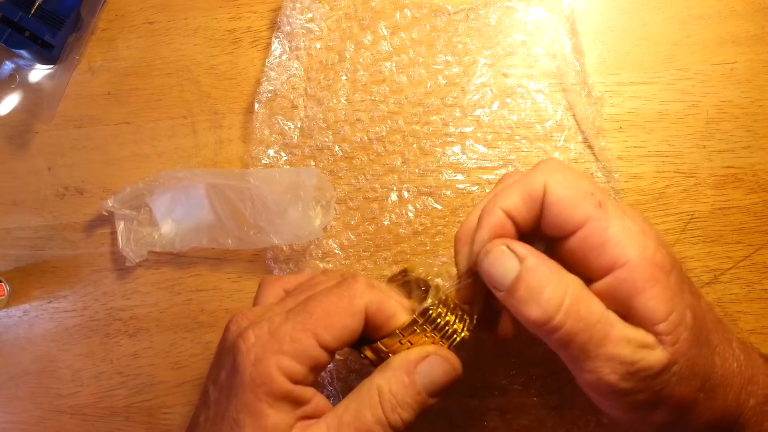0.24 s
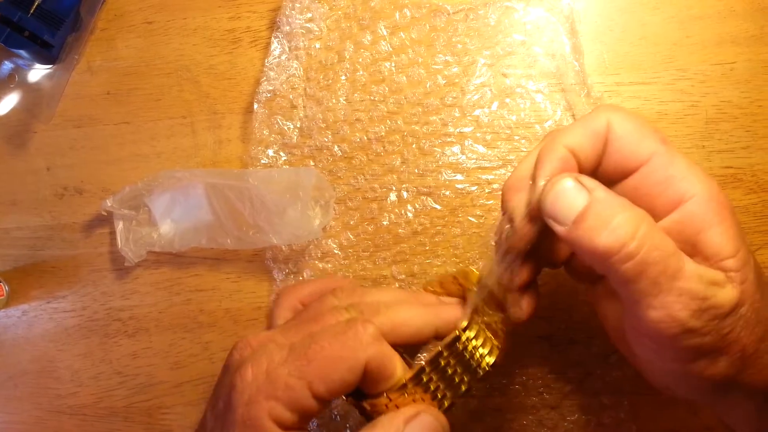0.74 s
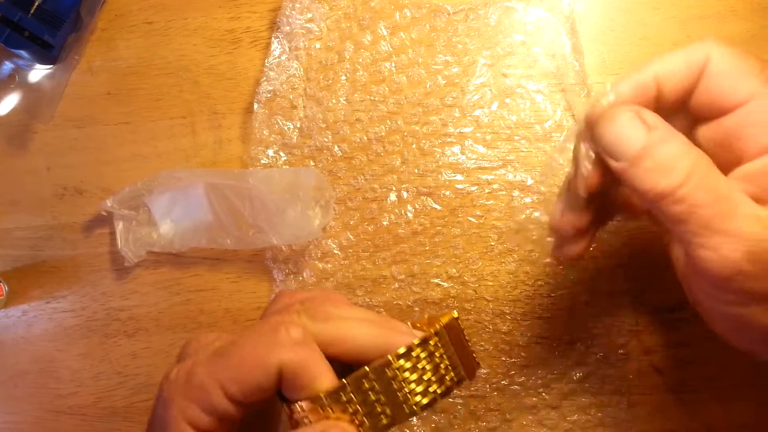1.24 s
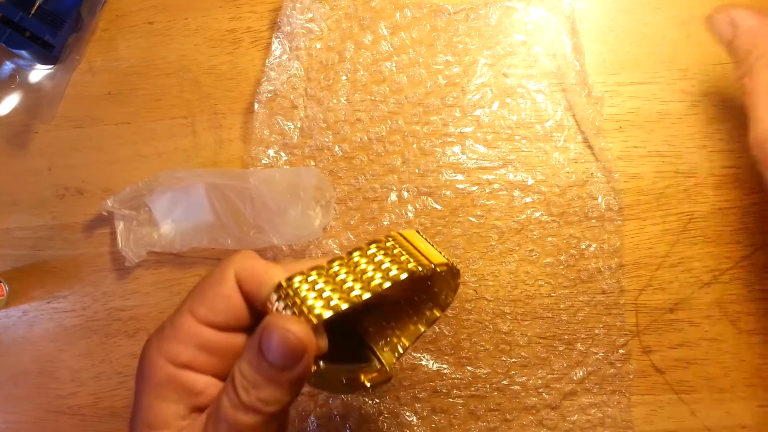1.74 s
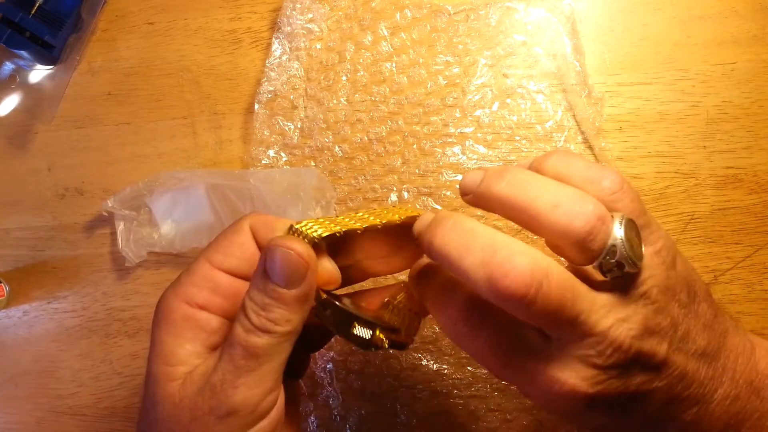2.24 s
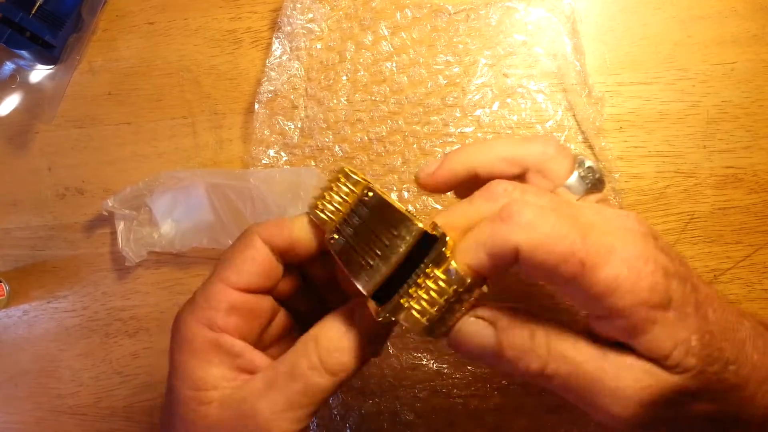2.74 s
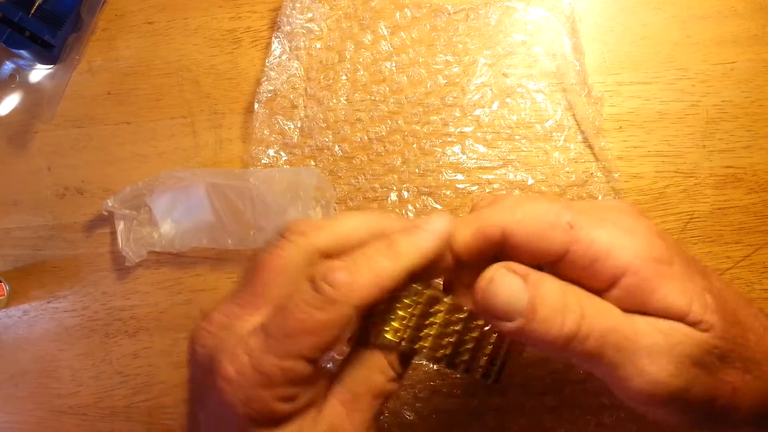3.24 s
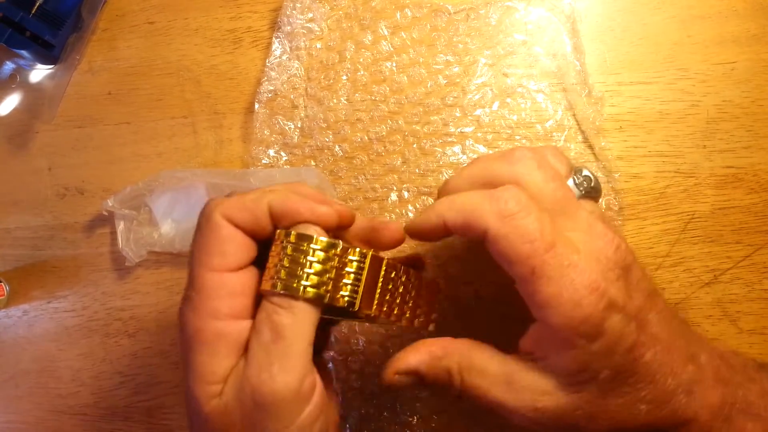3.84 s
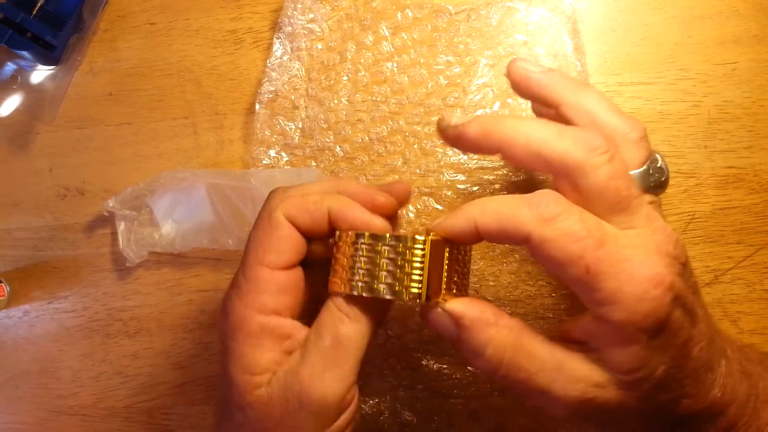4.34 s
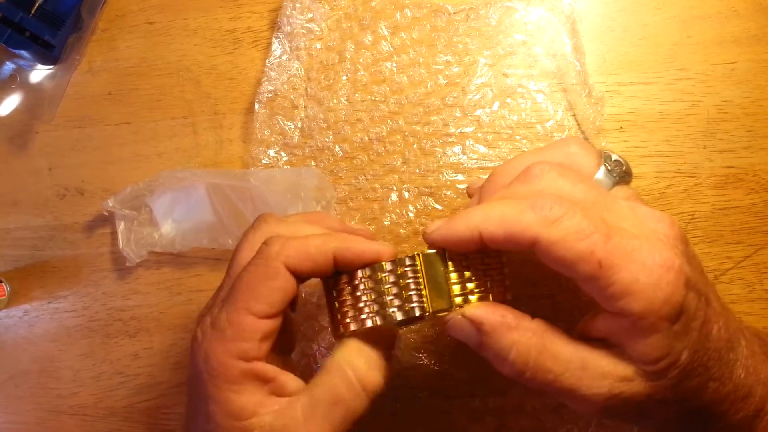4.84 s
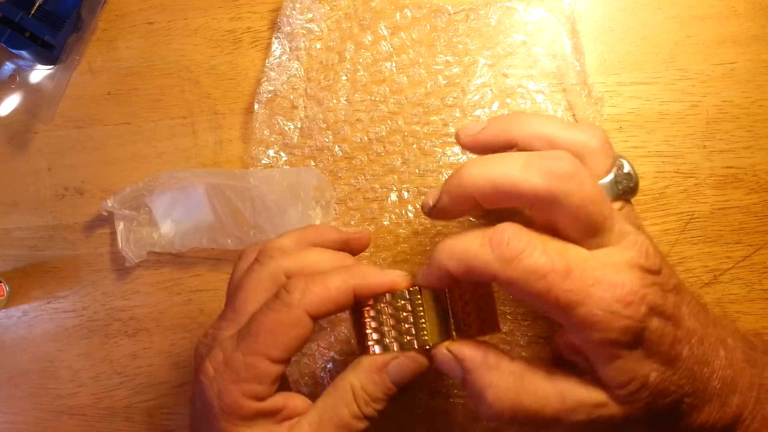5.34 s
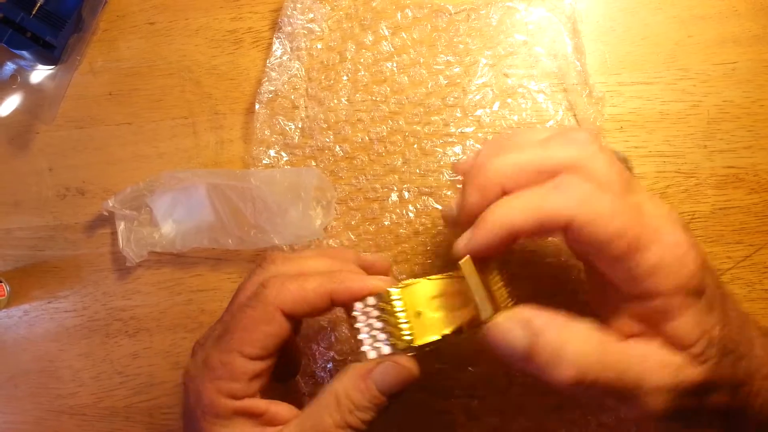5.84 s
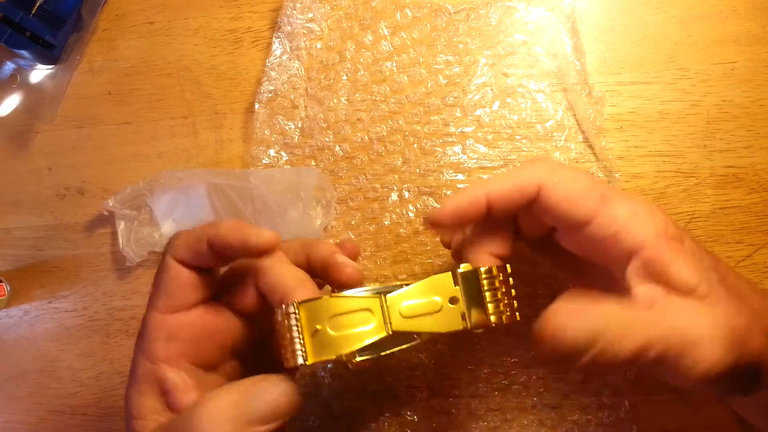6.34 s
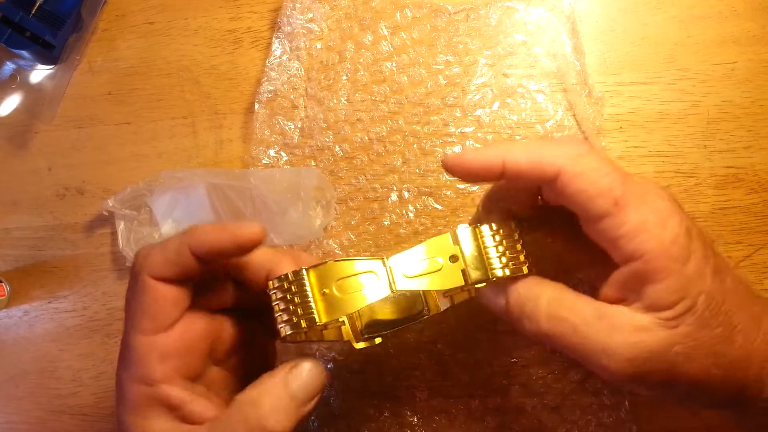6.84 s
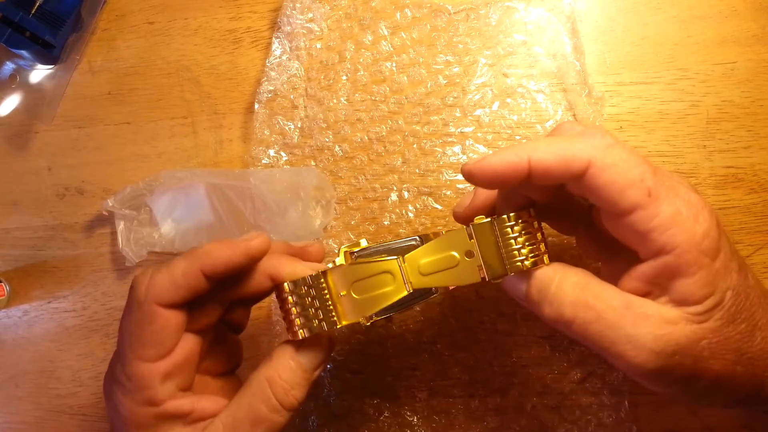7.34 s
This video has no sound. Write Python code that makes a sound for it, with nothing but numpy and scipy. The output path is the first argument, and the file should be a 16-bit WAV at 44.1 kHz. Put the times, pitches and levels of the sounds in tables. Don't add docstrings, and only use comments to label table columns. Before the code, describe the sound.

Plastic film tears off a metal watch bracelet in sharp snaps, then links clink and a clasp springs open with a bright metallic clack.

```python
import sys
import numpy as np
from scipy import signal
from scipy.fft import rfft, irfft
from scipy.io import wavfile
from scipy.ndimage import uniform_filter1d

SR = 44100
rng = np.random.default_rng(int(sys.argv[2]) if len(sys.argv) > 2 else 0)


def master(y):
    cut = np.clip(np.atleast_2d(y).T, -1, 1)
    pcm = np.round(cut * 32767)
    wavfile.write(sys.argv[1], SR, pcm.astype(np.int16))


def elevation(decibels):
    levels = np.asarray(decibels, float)
    return 10 ** (levels / 20)


N = 334249


def band(x, low_hz, high_hz):
    return signal.sosfilt(signal.butter(2, [low_hz, min(high_hz, .45 * SR)], "band", fs=SR, output="sos"), x)


def rms_one(x):
    return x / np.sqrt(np.mean(x ** 2) + 1e-20)


def top_one(x):
    return x / np.sqrt(uniform_filter1d(np.mean(x ** 2, axis=0), size=66).max())


def ring(clicks, hz, t60):
    radius, w = elevation(-60 / (t60 * SR)), 2 * np.pi * hz / SR
    return signal.lfilter([0, np.sin(w)], [1, -2 * radius * np.cos(w), radius ** 2], clicks + 1e-18)


# f/Hz, level/dB per Hz, left-right/dB
HISS_COLOUR = [(30.8, -19.5, 4), (59, -5.5, 1.5), (142, 1, 3.5), (198, -2.5, -2.5), (364, -7.5, 5),
               (610, -11, 0), (1030, -14.5, -1), (1850, -18.5, 0.5), (2800, -20, 1.5), (4660, -22.5, -0.5),
               (6000, -28, 1), (8100, -24, 3), (11200, -23.5, 2), (14500, -25, 3.5)]


def hiss():
    hz, db, pan_db = np.transpose(HISS_COLOUR)
    log_f = np.log(np.maximum(np.fft.rfftfreq(N, 1 / SR), 1))
    side = np.array([[1], [-1]])
    colour_db = np.interp(log_f, np.log(hz), db) + np.interp(log_f, np.log(hz), pan_db) / 2 * side
    white = rng.standard_normal((2, N))
    return elevation(-52) * rms_one(irfft(rfft(white) * elevation(colour_db), N))


# f/Hz, level/dB
MOTOR_HARMONICS = [(120.5, -75.5), (242, -75), (363, -72), (423, -70.5), (696, -73.5), (847.5, -79.5),
                   (969, -70.5), (1090, -71.5), (1211, -89), (1694, -87)]


def motor():
    white = rng.standard_normal((2, N + SR))
    return sum(elevation(db) * rms_one(ring(white, hz, t60=1.0)[:, SR:]) for hz, db in MOTOR_HARMONICS)


# t/s, level/dB, decay/s
TICK_SURGES = [
    (0.416, 1.5, 1),
    (3.663, 5, 0.19),
]


def frame_tick():
    ticks_per_s, start_s = 30.04721, .00946
    length_s, ramp_s, height, right_share = .001382, .00034, .048, -.07
    t = np.arange(N) / SR
    since = (t - start_s) % (1 / ticks_per_s)
    pulse = np.clip(since / ramp_s, 0, 1) - np.clip((since - length_s) / ramp_s, 0, 1)
    for stage in range(2):
        pulse = signal.lfilter(*signal.butter(1, 110, "high", fs=SR), pulse)
    w = 2 * np.pi * 217
    pulse = signal.lfilter(*signal.bilinear([1, 0, 0], [1, w / .65, w * w], SR), pulse)
    swell_db = sum(db * np.exp(-np.maximum(t - s, 0) / decay_s) * (t > s) for s, db, decay_s in TICK_SURGES)
    return height * elevation(swell_db) * pulse * [[1], [right_share]]


# f/Hz, t60/s, level/dB
ROOM_BANDS = [(497, 0.75, -16), (1080, 0.25, -5.5), (2020, 0.15, -4), (4440, 0.24, -8), (8600, 0.19, -6),
              (13600, 0.083, -3)]


def room(x):
    t = np.arange(16384) / SR
    white, tail = rng.standard_normal((2, 2, len(t))), 0
    for k, (hz, t60, db) in enumerate(ROOM_BANDS):
        noise = band(white[k % 2], hz / np.sqrt(2), hz * np.sqrt(2))
        dying = noise * elevation(-60 * t / t60) * np.clip(t / 0.00075, 0, 1)
        tail = tail + elevation(db) * dying * np.sqrt(np.log(10) * 6 / t60 / SR)
    return signal.fftconvolve(x.mean(axis=0, keepdims=True), tail, axes=1)[:, :N]


# t/s, level/dB
HANDLING = [(0, -68.5), (.27, -58.5), (.36, -63.5), (.88, -63.5), (1.2, -75), (2.1, -84.5), (2.5, -61),
            (2.78, -90.5), (2.93, -58.5), (3.28, -61.5), (3.5, -73.5), (4.2, -70), (4.29, -52), (4.4, -74),
            (5.6, -79), (5.7, -65.5), (6.26, -64.5), (6.4, -80)]
# t/s, start level/dB, hold/s, end level/dB
BURSTS = [
    (0.421, -37, 0.023, -31.5),
    (0.64, -44, 0.016, -40.5),
    (.895, -56, 0.073, -38),
    (3.665, -26, 0.017, -35.5),
]


def rustle_gain():
    t, attack_s, fall_db_per_s = np.arange(N) / SR, 0.001, 216
    curves = [np.interp(t, *np.transpose(HANDLING))]
    for s, db, hold, end_db in BURSTS:
        times = [s - attack_s, s, s + hold, s + hold + 1]
        levels = [db - 42, db, end_db, end_db - fall_db_per_s]
        curves.append(np.interp(t, times, levels, left=-200))
    return elevation(np.max(curves, axis=0))


def rustle(per_s, spread_db):
    sizes = elevation(spread_db * np.minimum(rng.exponential(1, (2, N)), 3)) * rng.choice([-1, 1], (2, N))
    grains = sizes * (rng.random((2, N)) < per_s / SR)
    grains = grains + 0.062 * grains[::-1]
    sound = band(grains, 2200, 6200) + elevation(-4) * band(grains, 1500, 15000)
    return rms_one(sound) * rustle_gain()


# f/Hz, width/Hz, level/dB
PORT_RESONANCES = [(4730, 2600, 2.5), (7060, 2400, -2.5), (9700, 1800, -10)]


def port(x):
    return x + sum(elevation(db) * band(x, hz - width / 2, hz + width / 2) for hz, width, db in PORT_RESONANCES)


def placed(rows, pan_db):
    scatter_db = 5 * rng.standard_normal(len(rows))
    return [(*row[:4], pan_db + 0.09 * row[3] + e, *row[4:]) for row, e in zip(rows, scatter_db)]


def knocks(rows, modes, modes_db, scrape_s, rattle_s, rattle_db, cycles, thump_hz, thump_db, spike, narrow):
    size = 3072
    out, t = np.zeros((2, N + size)), np.arange(size) / SR
    noise = rng.standard_normal((len(rows), 3, size))
    strengths = rng.uniform(-1.7, 1, (len(rows), len(modes)))
    decay = np.exp(-t / scrape_s) + elevation(rattle_db) * np.exp(-t / rattle_s)
    edge = decay * np.clip(.1 + t / 0.00045, 0, 1)
    noise[:, 0, 12] = spike * np.sign(noise[:, 0, 12])
    for row, (shared, left, right), chance in zip(rows, noise, strengths):
        s, db, hz, bright_db, pan_db = row[:5]
        low_db = row[5] if len(row) > 5 else thump_db
        sides = np.array([left, right])
        both = edge * (shared + 0.33 * sides)
        apart = edge * (.9 * shared + sides)

        lowest_hz = max(narrow * hz, 1600)
        resonance = ring(both, hz, min(cycles, 12) / hz) * .2 + port(both)
        click = top_one(band(band(resonance, lowest_hz, 7500), .7 * lowest_hz, 7500))
        bright = top_one(band(port(apart), 6300, 16000))
        push = edge * shared + .15 * both
        thump = .02 * ring(push, thump_hz * elevation(.6 * chance[0]), .012) + push
        thump = top_one(band(thump, 480, 2000))
        body = 0
        for (m_hz, m_db, t60), e in zip(modes, chance):
            dull_db = min(bright_db, 0) if m_hz > 6500 else 0
            body = body + elevation(m_db + 3 * e + dull_db) * ring(both, m_hz * elevation(.02 * e), t60)

        sound = click + elevation(bright_db) * bright + elevation(low_db) * thump + elevation(modes_db) * body
        sound = elevation(db) * sound * elevation(pan_db / 2 * np.array([[1], [-1]]))
        at = round(s * SR)
        out[0, at + 2:at + size] += sound[0, :-2]
        out[1, at:at + size] += sound[1]
    return out[:, :N]


def faint_touches(count):
    t = np.arange(0, N / SR - .1, .001)
    share = np.cumsum(elevation(.8 * np.interp(t, *np.transpose(HANDLING))))
    chance = rng.random((count, 4))
    s = np.interp((np.arange(count) + chance[:, 0]) / count, share / share[-1], t)
    click_db = -55 + 4 * (chance[:, 1] - .5)
    click_hz = 3900 * elevation(3.2 * (chance[:, 2] - 1.0))
    return np.transpose([s, click_db, click_hz, -12 + 14 * chance[:, 3]])


# t/s, level/dB, f/Hz, bright level/dB
LINK_TAPS = [(1.4325, -51, 2720, -5), (1.5817, -51, 2800, -2), (1.6172, -47, 3800, -13),
             (1.6241, -37.5, 4070, -7), (1.8182, -51, 2950, -15), (2.1354, -47.5, 4800, -2),
             (2.2288, -46.5, 4600, -6), (2.2371, -47.5, 1940, -6), (2.4954, -50, 3660, -9),
             (2.5327, -46.5, 4820, -2), (2.666, -51, 4950, -1), (2.8026, -52.5, 5000, -7),
             (2.8576, -50, 4610, 3), (2.8804, -46, 4100, -10), (2.8897, -51.5, 4350, 6.5),
             (2.92, -46.5, 3880, 4), (2.9336, -45.5, 4820, 3), (3.0058, -47, 4640, -3),
             (3.0078, -40.5, 6200, -11), (3.0143, -41, 5500, 9), (3.0245, -35, 4700, 5),
             (3.0312, -43, 5000, 6), (3.0975, -51, 4500, -14), (3.1128, -48.5, 4230, -11),
             (3.1516, -40, 3840, -11), (3.1535, -42, 5500, -4), (3.1987, -44.5, 4700, -1),
             (3.2595, -46.5, 4610, 4), (3.2802, -46.5, 3320, -8), (3.2845, -41.5, 4390, -11),
             (3.3052, -42, 6300, 1), (3.4043, -44, 3600, 2), (3.4695, -47.5, 2930, -3),
             (3.637, -50.5, 4260, 8.5), (3.82, -54, 3620, 12), (3.8808, -55.5, 3790, 8), (3.911, -49, 3190, 0),
          (3.9582, -47, 3660, 0), (3.9735, -48, 4090, 5.5), (3.9961, -34.5, 3730, 2.5),
          (3.9987, -43.5, 4120, 1), (4.004, -39.5, 3930, -3), (4.0822, -45.5, 5040, 1.5),
          (4.226, -48, 4700, -6), (4.2482, -48, 4650, -2), (4.2595, -35, 5140, 2.5),
          (4.268, -43, 4310, -10), (4.2754, -52, 4570, -7), (4.284, -41, 4830, 2), (4.2917, -42, 4400, -7),
          (4.3001, -36, 4850, 0), (4.3062, -35.5, 4400, -9), (4.315, -45, 3620, -8),
          (4.327, -41, 4060, 3.5), (4.39, -46, 5600, -3), (4.5885, -45, 4900, -8), (4.722, -52, 3640, -14),
          (4.9418, -54, 4520, -11), (4.9948, -46.5, 4300, -8), (5.173, -48, 4200, 3),
          (5.1932, -40.5, 5340, 3.5),
             (5.6555, -50, 2630, -8), (5.676, -40.5, 6160, 5), (5.6828, -43, 6400, 4),
             (5.6867, -46, 2630, -7), (5.6927, -43.5, 2500, -7), (5.782, -38.5, 5300, 0.5),
             (5.875, -49, 4160, -4), (5.8995, -67, 3000, -10), (5.9135, -42.5, 2980, -6),
             (5.961, -45, 4200, -10), (5.9652, -41, 4320, 2), (5.973, -43, 3490, -4),
             (6.0135, -52, 1510, -10), (6.0717, -42, 3880, -1), (6.095, -51, 3500, -3),
             (6.1012, -49, 1340, 7), (6.107, -37.5, 4100, 2), (6.1356, -51, 4260, -5),
             (6.189, -50, 1960, -2), (6.2325, -52, 4200, -6), (6.2413, -46, 2240, -4),
             (6.248, -52, 5000, 5), (6.253, -47, 2450, 3), (6.2653, -45, 3200, -8), (6.273, -44, 4430, -10),
             (6.311, -39.5, 5540, -8), (7.1187, -49.5, 3820, -2)]
# f/Hz, level/dB, t60/s
LINK_MODES = [(4090, -11, 0.022), (7480, -20, 0.033), (10100, -13, .04), (11700, 22, 0.06)]


def link_knocks():
    rows = placed([*LINK_TAPS, *faint_touches(count=16)], pan_db=-2.5)
    return knocks(rows, LINK_MODES, modes_db=-55, scrape_s=0.0016, rattle_s=0.0075, rattle_db=-15,
                  cycles=16.0, thump_hz=800, thump_db=-14.0, spike=4.5, narrow=0.39)


# t/s, level/dB, f/Hz, bright level/dB, thump level/dB
CLASP = [
    (3.6652, -16, 3900, 0, -16),
    (3.6722, -18.5, 3900, 3, -30),
    (3.6765, -20, 3800, 2, -30),
    (3.6815, -21, 4300, 3, -30),
    (3.6868, -22, 4200, 0, -30),
    (3.6899, -17, 4100, 5, -30),
    (3.6938, -23, 4300, 2, -30),
    (3.7112, -33, 4180, -4, -40),
]
# f/Hz, level/dB, t60/s
CLASP_MODES = [(3410, -14, .1), (3800, -9, .05), (4095, -7, .12), (4380, -13, .07), (7500, -15, .04),
               (8010, -10, .04), (9840, -8, .04), (10070, -6, .05), (10470, 0, .11), (10900, -3, .07),
               (11240, -1, .1), (11330, -2, .06), (11680, -3, .04), (12550, -12, .03)]


def clasp_opening():
    return knocks(placed(CLASP, pan_db=1.5), CLASP_MODES, modes_db=-23, scrape_s=0.00086, rattle_s=0.0028,
                  rattle_db=-18, cycles=18.0, thump_hz=960, thump_db=-22, spike=3.2, narrow=0.69)


def struck(blows):
    out, click = np.zeros(N + SR), np.eye(1, 8192)[0]
    for s, db, hz, t60 in blows:
        out[round(s * SR):][:8192] += elevation(db) * ring(click, hz, t60)
    out = signal.lfilter(*signal.iirnotch(1150, 2.2, SR), band(out, 300, 12000))
    return np.array([elevation(-1.0) * np.roll(out, 3), elevation(2.5) * out])[:, :N]


# t/s, level/dB, f/Hz, t60/s
THUDS = [
    (.4401, -21, 640, .025),
    (.4436, -24, 640, .025),
    (.765, -26, 700, .018),
    (3.6653, -22, 1500, .008),
]


def body_thuds():
    return struck(THUDS)


# t/s, level/dB
POPS = [
    (0.8937, -13.5),
    (.9277, -14),
]
# f/Hz, level/dB, t60/s
POP_MODES = [(380, -22, .04), (900, -22, .012), (1650, -10, .01), (1845, -10, .035), (1965, -9, .04),
             (2000, -3, .008), (2130, -10, .03), (2455, -7, .03), (3030, -11, .02), (3450, -13, .02),
             (3850, -10, .015), (4300, -11, .015), (4860, -3, .008), (5300, -7, .01)]


def film_pops():
    blows = []
    for s, db in POPS:
        for (hz, mode_db, t60), e in zip(POP_MODES, rng.uniform(-1.5, 1.5, len(POP_MODES))):
            blows.append((s, db + mode_db + e, hz, t60))
    return struck(blows)


# f/Hz, level/dB, t60/s
FILM_MODES = [(1060, 3, 0.015), (1850, -10, 0.061), (2140, -36, 0.028), (2500, 3, 0.019)]
# t/s, level/dB, f/Hz, bright level/dB, thump level/dB
CRACKLES = [(0.0854, -35.5, 3960, -5.5, -17), (0.0988, -44, 2580, -6, -16), (0.2232, -40.5, 4080, -6, -23),
            (0.2265, -38, 4200, -9, -21), (0.233, -44, 4350, -13, -12), (0.2609, -53, 3880, -12, -20),
            (0.2682, -37.5, 4170, -0.5, -15), (0.3022, -37.5, 5370, -1.5, -20),
            (0.6063, -44, 1690, -10, -11), (0.6906, -45, 3670, -14, -17), (0.7139, -39, 3980, -11, -25),
            (0.7324, -43, 4820, -3, -10), (0.757, -47, 3700, -10, -27), (0.7486, -39, 4690, -4, -15),
            (0.7684, -46, 4390, -7, 3), (0.7734, -37, 3920, -6, -23), (0.7893, -32, 3620, -4, -18),
            (0.8439, -52, 1850, 7, -9), (0.8504, -47, 3620, -6, -1), (0.854, -42, 4310, -2, -13),
            (0.8698, -39, 3700, -2, -21), (1.045, -40.5, 2520, -2, -30), (1.0957, -47, 1340, -1, -7),
            (1.1385, -47.5, 4650, 1, -10)]


def film_crackles():
    return knocks(placed(CRACKLES, pan_db=-3.0), FILM_MODES, modes_db=-39, scrape_s=0.00089, rattle_s=0.0048,
                  rattle_db=-11.5, cycles=11.0, thump_hz=750, thump_db=-20, spike=7.7, narrow=0.42)


# t/s, level/dB, f/Hz, bright level/dB, thump level/dB
SNAPS = [(.4107, -17, 4000, 2, -15), (.4131, -17, 4200, -3, -15), (.4148, -21, 4000, -6, -12),
         (.4195, -27, 1200, -8, -7), (.4332, -24, 3700, -5, -24), (.4401, -23, 3620, -12, -14),
         (.4449, -23, 4910, -11, -14), (.4497, -27, 3000, -4, -10), (.451, -14.5, 4200, -2, -20),
         (.4692, -31, 4260, 0, -9), (.6396, -40, 3800, 3, -8), (.6457, -20, 4700, -7, -10),
         (.6538, -27, 4300, -6, -20), (.7044, -32, 4700, -10, -20), (.7649, -30, 4400, -3, -14),
         (.8935, -19, 4800, -2, -25), (.8965, -22, 3500, 2, -22), (.9011, -25, 3600, -12, -25),
         (.9112, -31, 2150, -9, -24), (.9172, -30, 1980, -11, -24), (.9276, -21, 4800, -5, -25),
         (.9352, -20, 5400, 6.5, -22), (.9405, -25, 2000, 2, -22), (.9524, -30, 3190, 0, -12)]


def film_snaps():
    return knocks(placed(SNAPS, pan_db=-2.0), FILM_MODES, modes_db=-35, scrape_s=0.0013, rattle_s=0.0063,
                  rattle_db=-14.5, cycles=6.5, thump_hz=770, thump_db=-20, spike=7.8, narrow=0.47)


def scene():
    near = rustle(per_s=2100, spread_db=4.0) + link_knocks() + elevation(-1.0) * clasp_opening()
    near = near + body_thuds() + film_pops() + film_crackles() + elevation(2.1) * film_snaps()
    return hiss() + motor() + frame_tick() + elevation(3.0) * room(near) + near


def band_limit(x):
    return signal.sosfilt(signal.butter(12, 16670, fs=SR, output="sos"), x)


def record(dry):
    body = signal.sosfiltfilt(signal.ellip(8, .3, 40, 14550, fs=SR, output="sos"), dry)
    top = signal.sosfiltfilt(signal.ellip(4, .3, 35, [14600, 16400], "band", fs=SR, output="sos"), dry)
    power = uniform_filter1d(top ** 2, size=256)
    rising = power / (uniform_filter1d(power, size=2048) + elevation(-54) ** 2)
    mix = body + elevation(-26) * top * np.clip(rising - 1.5, 0, 1)
    return band_limit(mix)


dry = scene()
out = record(dry)
master(out)
```